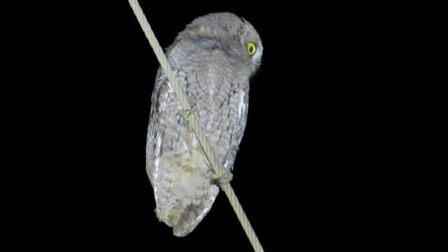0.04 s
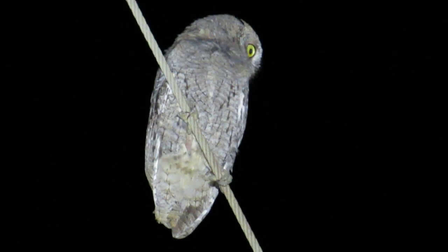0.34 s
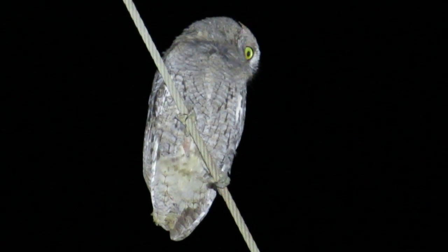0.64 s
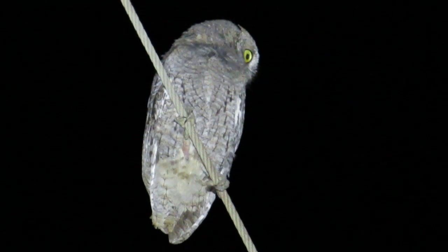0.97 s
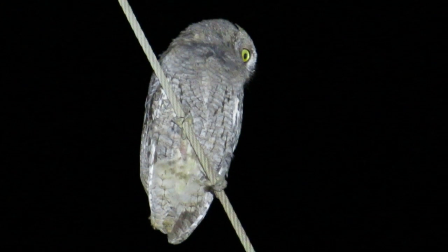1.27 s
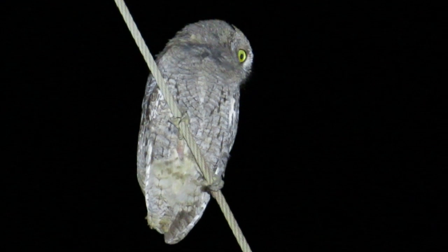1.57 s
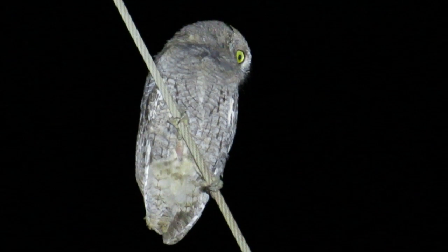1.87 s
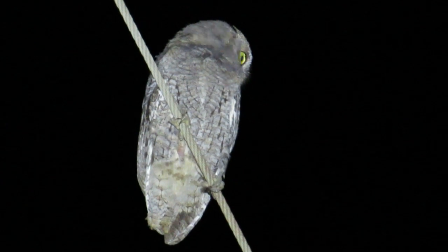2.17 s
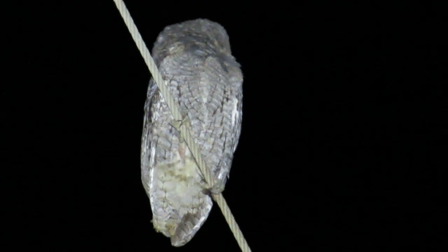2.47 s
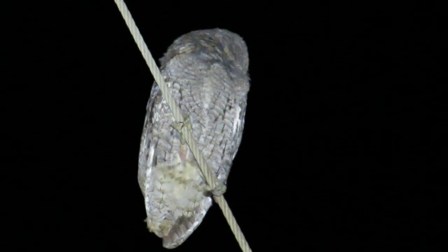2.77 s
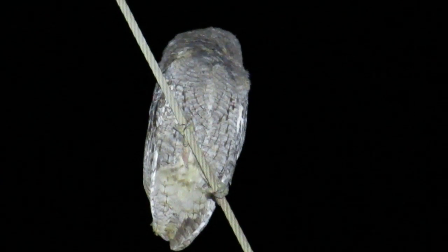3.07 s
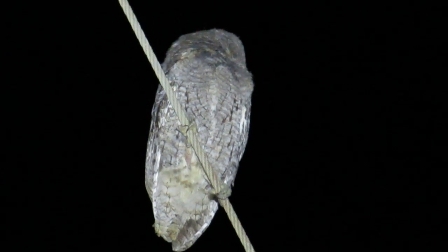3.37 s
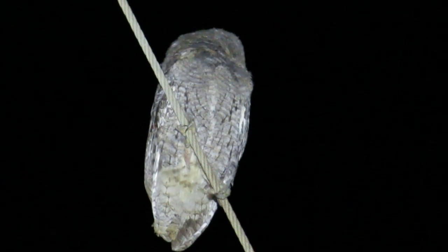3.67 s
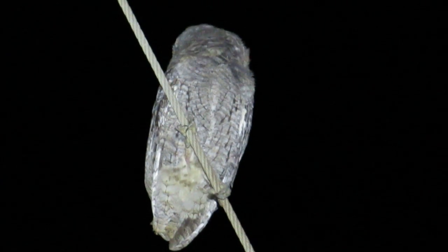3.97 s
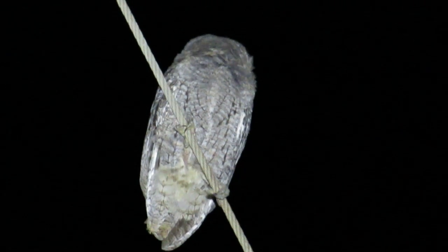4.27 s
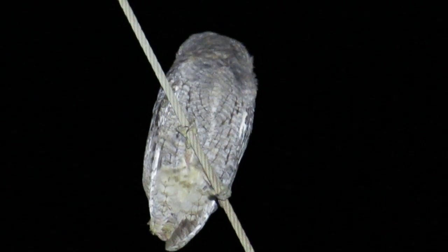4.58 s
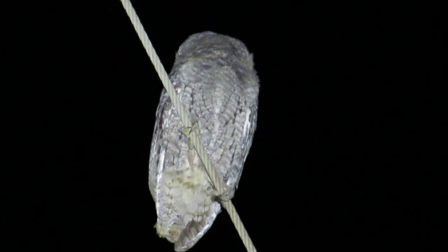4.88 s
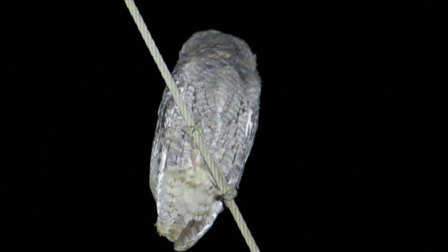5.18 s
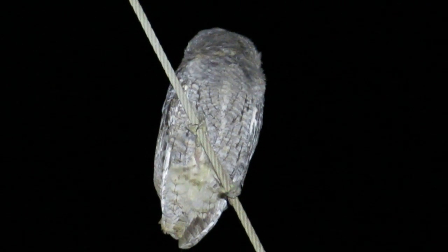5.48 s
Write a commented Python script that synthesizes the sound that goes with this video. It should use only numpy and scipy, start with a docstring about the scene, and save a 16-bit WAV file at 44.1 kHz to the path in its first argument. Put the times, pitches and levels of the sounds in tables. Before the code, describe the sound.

A small owl gives two thin, raspy squeaks over a droning fan unit and the very high buzz of bush-crickets.

```python
"""Owl squeaks at night

A fan unit and its compressor drone over a low rush of air, while bush-crickets scrape their
wings in a very high buzz. A small animal, probably an owl, gives two thin squeaks that sag in
pitch and turn raspy. A few faint ticks come and go. Nearby surfaces echo squeaks and ticks."""
import sys
import numpy as np
from scipy import signal
from scipy.fft import rfft, irfft
from scipy.io import wavfile

SR = 44100
rng = np.random.default_rng(int(sys.argv[2]) if len(sys.argv) > 2 else 0)


def output_pcm(signal):
    """Save a mono or channel-first signal as 16-bit PCM at the path in sys.argv[1].

    Samples are clipped to [-1, 1] before scaling.
    """
    pcm = np.clip(np.atleast_2d(signal).T, -1, 1) * 32767
    wavfile.write(sys.argv[1], SR, np.round(pcm).astype(np.int16))


N = 243873
TIME = np.arange(N) / SR
FREQS = np.maximum(np.fft.rfftfreq(N, 1 / SR), 1)


def from_db(db):
    """Turn decibels into a number to multiply by."""
    return 10 ** (np.asarray(db) / 20)


def unit_power(x):
    """Scale a signal so that its average power is 1."""
    return x / np.sqrt(np.mean(x ** 2) + 1e-20)


def curve(points):
    """Join (frequency, value) points with lines, giving every octave equal room."""
    hz, value = np.transpose(points)
    return np.interp(np.log(FREQS), np.log(hz), value)


def drift(rate):
    """A random wobble of about size 1, up to about `rate` times a second."""
    steps = 2 * rate * TIME
    turns = rng.standard_normal(int(steps[-1]) + 2)
    return unit_power(np.interp(steps, np.arange(len(turns)), turns))


def stereo_noise(density_db, likeness):
    """Shaped noise for two ears; where likeness is 1, both hear the same wave."""
    shared, opposed = rfft(rng.standard_normal((2, N)))
    alike = np.clip(curve(likeness), -1, 1)
    pair = np.sqrt(1 + alike) * shared + np.sqrt(1 - alike) * opposed * [[1], [-1]]
    return irfft(pair * from_db(density_db) * np.sqrt(SR) / 2, N)


def turning(hz, wander, rate=2):
    """The angle of a repeating motion whose speed wanders."""
    return 2 * np.pi * (np.cumsum(hz * (1 + wander * drift(rate))) / SR + rng.random())


def motor(hz, orders, wander, flutter_db):
    """A spinning shaft hums at multiples of its speed; each tone swells and sinks a little."""
    angle, out = turning(hz, wander), 0
    for multiple, left_db, right_db in orders:
        tone = np.sqrt(2) * np.sin(multiple * angle + 2 * np.pi * rng.random())
        flutter = from_db(flutter_db * np.sqrt(multiple) * drift(3))
        out = out + from_db([[left_db], [right_db]]) * tone * flutter
    return out


# Tones of the two motors: multiple of shaft speed, left level/dB, right level/dB
FAN_TONES = [(1, -21.5, -27), (2, -32.5, -36.5), (5, -48.5, -48), (6, -44, -65), (9, -49, -45.5),
             (12, -50, -54)]
COMPRESSOR_TONES = [(1, -65, -56), (4, -51, -56), (5, -45, -45.5), (10, -44, -49.5)]
# Tones of the casing: f/Hz, level/dB
CASING_TONES = [(79.8, -47.5), (421, -52.5), (478.8, -56.5)]

def fan_drone():
    """The fan and the compressor spin, and their casing hums along."""
    fan = motor(hz=23.34, orders=FAN_TONES, wander=0.00075, flutter_db=0.22)
    compressor = motor(hz=37.868, orders=COMPRESSOR_TONES, wander=0.0012, flutter_db=0.5)
    casing = sum(from_db(db) * np.sin(turning(hz, wander=0.00144)) for hz, db in CASING_TONES)
    return fan + compressor + np.sqrt(2) * casing


# Rush of air, from bass to treble: f/Hz, level/dB per Hz
AIR_SHAPE = [(20, -76), (45, -61), (70, -53), (95, -54.5), (140, -59), (200, -56), (245, -59), (320, -56.5),
             (460, -64), (620, -64), (900, -72.5), (1600, -72), (2400, -83), (3300, -88.5), (4500, -91.5),
             (9000, -105)]
# Pitches at which the fan housing rings: f/Hz, width/Hz, boost/dB
HOUSING_PEAKS = [(792, 55, 4), (976, 94, 6.5), (1305, 72, 5), (2713, 75, 5.5), (3183, 226, 7.5)]
# Which side the air is louder on: f/Hz, left minus right/dB
AIR_BALANCE = [(100, -2.5), (350, 0.4), (650, -2), (900, -3), (1400, 1.5), (2000, -1.5), (2800, -2),
               (5000, -1)]
# How alike the air is in both ears: f/Hz, likeness
AIR_LIKENESS = [(60, 1), (330, 0.86), (600, 0.49), (800, 0.41), (1000, 0.79), (1700, 0.59), (2600, 0.28),
                (7000, .2)]

def rushing_air():
    """Air rushes through the fan housing, which boosts a few pitches."""
    peaks_db = sum(db / (1 + (2 * (FREQS - hz) / width) ** 2) for hz, width, db in HOUSING_PEAKS)
    sides_db = curve(AIR_BALANCE) * [[.5], [-.5]]
    air = stereo_noise(curve(AIR_SHAPE) + peaks_db + sides_db, AIR_LIKENESS)
    return air * from_db(0.31 * drift(4.6))


def from_right(pair, lag_s=.000015):
    """A sound from the right reaches the left ear a moment later."""
    left, right = pair
    late_left = irfft(rfft(left) * np.exp(-2j * np.pi * FREQS * lag_s), N)
    return np.array([late_left, right])


def scattered(x, fade_s):
    """Many weak echoes, different in each ear, fade by 60 dB in fade_s."""
    age = TIME[:SR // 2]
    paths = rng.standard_normal((2, len(age))) * np.exp(-np.log(1000) * age / fade_s)
    paths /= np.sqrt(np.sum(paths ** 2, axis=1, keepdims=True))
    return signal.fftconvolve(x[None], paths, axes=1)[:, :N]


# How a wing rings: multiple of its main pitch, relative level/dB
WING_SHAPE = [(.6, -43), (.7, -16.5), (.78, -11), (.85, -16), (.94, -7), (1, -0.5), (1.06, -6), (1.13, -11),
              (1.22, -27)]
# Nearby bush-crickets: stroke rate/Hz, wing f/Hz, left level/dB, right level/dB,
# steepness of each stroke's swell, level of the echoes from leaves/dB
NEAR_CRICKETS = [(88, 13800, -43, -48, 1.2, 0), (94.4, 13230, -44, -45.5, 2.7, -5)]

def cricket(stroke_hz, wing_hz, left_db, right_db, steepness, leaves_db):
    """Each stroke drags a ridged file over a scraper; the wing rings and leaves scatter the sound."""
    stroke = (turning(stroke_hz, wander=.002) / (2 * np.pi)) % 1
    scrape = rng.standard_normal(N) * stroke ** steepness  # swells, then stops short
    wing = from_db(curve(np.array(WING_SHAPE) * [wing_hz, 1]))
    song = irfft(rfft(scrape) * wing, N)
    direct = np.array([song, np.roll(song, 1)])  # reaches the right ear one sample later
    leaves = from_db(leaves_db) * scattered(song, fade_s=0.021)
    return from_db([[left_db], [right_db]]) * unit_power(direct + leaves)


# Faraway bush-crickets: f/Hz, level/dB per Hz
CHORUS_SHAPE = [(7000, -115), (8700, -101), (9400, -91), (10400, -87.5), (11500, -86), (12400, -78),
                (13500, -75.5), (14400, -76), (15000, -85), (15500, -98)]
# How alike both ears are, for the chorus and the microphone's hiss: f/Hz, likeness
HISS_LIKENESS = [(5000, 0.27), (9000, -0.15), (13500, -.25)]

def far_chorus():
    """Many distant crickets blend into one high hiss."""
    return stereo_noise(curve(CHORUS_SHAPE), HISS_LIKENESS)


# The microphone's own noise: f/Hz, level/dB per Hz
HISS_SHAPE = [(1000, -102.5), (5000, -91.5), (7500, -95.5), (9000, -103), (15000, -100)]

def microphone_hiss():
    """The microphone adds a faint, steady hiss."""
    return stereo_noise(curve(HISS_SHAPE), HISS_LIKENESS)


# Faint ticks: t/s, peak level/dB, f/Hz, time to fade by 30 dB/s
TICKS = [(.479, -42, 8200, .03), (2.662, -35.5, 4860, 0.013), (2.668, -38, 3200, 0.028),
         (4.073, -42, 8200, .04), (5.147, -36, 2500, .012), (5.242, -44, 7400, .012)]

def ticks():
    """Tiny dry snaps: each is a dying burst of noise that rings around one pitch."""
    out = np.zeros(N)
    for start, db, hz, fade_s in TICKS:
        age = np.maximum(TIME - start, 0)
        burst = rng.standard_normal(N) * (TIME >= start) * np.exp(-np.log(1000) * age / (2 * fade_s))
        sharpness = np.clip(hz * fade_s / 30, 2, 12)  # a longer ring has a clearer pitch
        snap = signal.lfilter(*signal.iirpeak(hz, sharpness, fs=SR), burst + 1e-18)
        out += from_db(db) * snap / np.abs(snap).max()
    return out


# Echoes off nearby surfaces: left delay/s, right delay/s, level/dB
ECHOES = [(.00247, .00235, -17), (.00392, .00354, -16), (.01156, .01189, -15)]

def with_echoes(x, tail_db=-25):
    """Nearby surfaces bounce the sound to each ear; a faint tail of scattered sound follows."""
    out = np.array([x, x])
    for left_s, right_s, db in ECHOES:
        echo = np.array([np.interp(TIME - lag, TIME, x) for lag in (left_s, right_s)])
        out = out + from_db(db) * echo
    return out + from_db(tail_db) * scattered(x, fade_s=0.25)


# Higher tones in the voice: multiple of the pitch, relative level/dB
OVERTONES = [(2, 0), (3, -9)]
# The hiss in the rasp: f/Hz, relative level/dB
RASP_SHAPE = [(1800, -50), (3000, -6.5), (4000, -2.5), (4700, 2), (5500, -8), (7000, -13.5), (8500, -17),
              (11000, -16), (15000, -32)]
# The path of each squeak, one list apiece: t/s, f/Hz, relative level/dB
SQUEAKS = [
    [(2.952, 4530, -29), (2.962, 4180, -27), (2.97, 4193, -16.5), (2.982, 4157, -15), (2.996, 4175, -26),
     (3.014, 4170, -19), (3.04, 4224, -26), (3.05, 4440, -26), (3.063, 4400, -31)],
    [(4.66, 4520, -27.5), (4.69, 4372, -21), (4.7, 4110, -32), (4.706, 4200, -22), (4.736, 3936, -28),
     (4.742, 3680, -29.5), (4.76, 3794, -24), (4.766, 4000, -33), (4.781, 4446, -33.5)],
]

def squeak(rows, jitter=0.031, tone_db=4.5, hiss_db=2.0):
    """A thin whistle sags and rises; as it turns raspy, it shakes and a hiss spreads around it."""
    times, hz, db = np.transpose(rows)
    glide, body_db = np.interp(TIME, times, hz), np.interp(TIME, times, db)
    before, after = np.maximum(times[0] - TIME, 0), np.maximum(TIME - times[-1], 0)
    level = from_db(body_db - 3200 * before - 1900 * after)  # swells and fades, in dB per second
    # The rasp grows steadily up to a limit; louder moments are purer.
    age = np.maximum(TIME - times[0], 0)
    clean_db, growth_db_per_s, full_db = -30, 175, -14.5
    purity, usual_db = 0.31, -24
    rasp_db = np.minimum(clean_db + growth_db_per_s * age, full_db) - purity * (body_db - usual_db)
    rasp = from_db(rasp_db)
    # Overtones grow with the rasp and thin out above 4200 Hz.
    thinning_db = 0.05 * np.maximum(glide - 4200, 0)
    overtone_db = -20.5 + 0.57 * (rasp_db - full_db) - thinning_db
    pitch = glide * (1 + jitter * rasp * drift(370))
    angle = 2 * np.pi * np.cumsum(pitch) / SR
    overtones = sum(from_db(db + 0.95 * drift(120)) * np.sin(k * angle) for k, db in OVERTONES)
    tone = np.sin(angle) + from_db(overtone_db) * overtones
    # The squeak's loudness flutters unevenly, about 180 times a second, more as it turns raspy.
    flutter = 1 + rasp * (1.6 * drift(400) + 2.6 * np.sin(turning(180, wander=.2, rate=60)))
    hiss = unit_power(irfft(rfft(rng.standard_normal(N)) * from_db(curve(RASP_SHAPE)), N))
    return level * (from_db(tone_db) * tone * flutter + from_db(hiss_db) * rasp * hiss)


def scene():
    """Squeaks and fan sit a little to the right; ticks, insects and hiss are all around."""
    calls = with_echoes(sum(squeak(rows) for rows in SQUEAKS)) * from_db([[-1], [.7]])
    insects = sum(cricket(*row) for row in NEAR_CRICKETS) + far_chorus()
    fan_unit = fan_drone() + rushing_air()
    return from_right(fan_unit + calls) + with_echoes(ticks()) + insects + microphone_hiss()


# Narrow gaps in the treble: f/Hz, width/Hz
NOTCHES = [(3950, 280), (7880, 83)]
CUTOFF_HZ = 15450

def record(dry):
    """Cut out two narrow bands of pitch, and everything above the cutoff."""
    for hz, width in NOTCHES:
        dry = signal.lfilter(*signal.iirnotch(hz, hz / width, fs=SR), dry)
    return irfft(rfft(dry) / np.sqrt(1 + (FREQS / CUTOFF_HZ) ** 400), N)


dry = scene()
out = record(dry)
output_pcm(out)
```